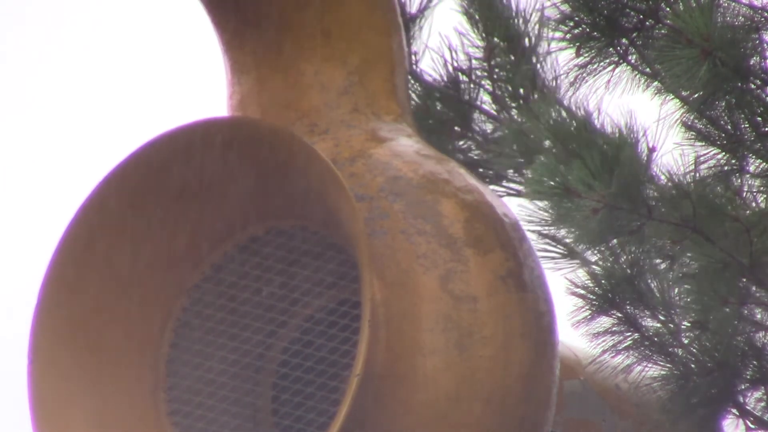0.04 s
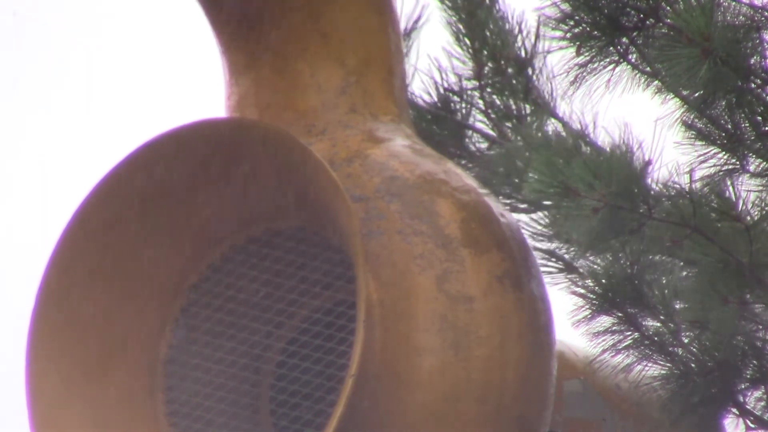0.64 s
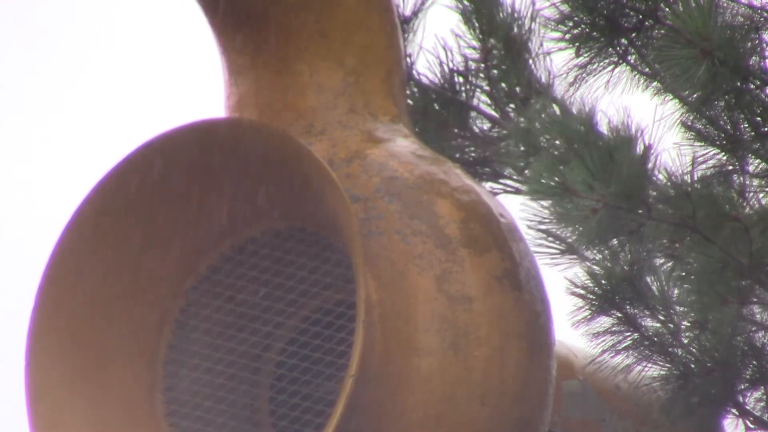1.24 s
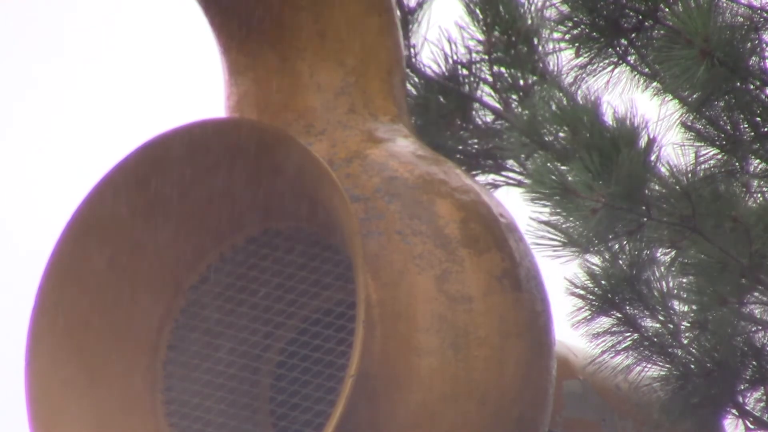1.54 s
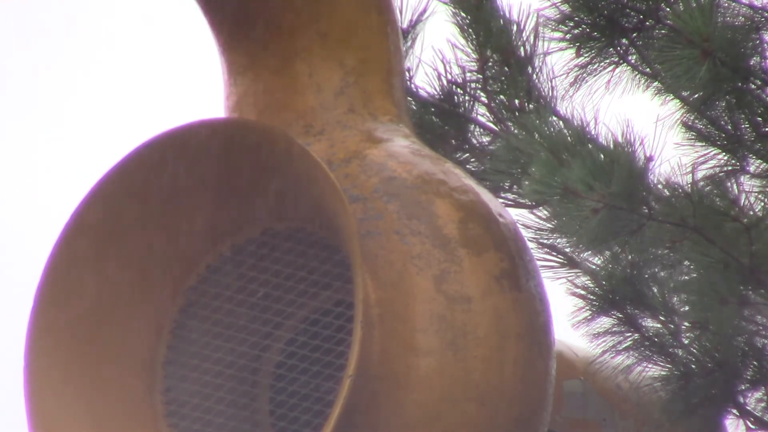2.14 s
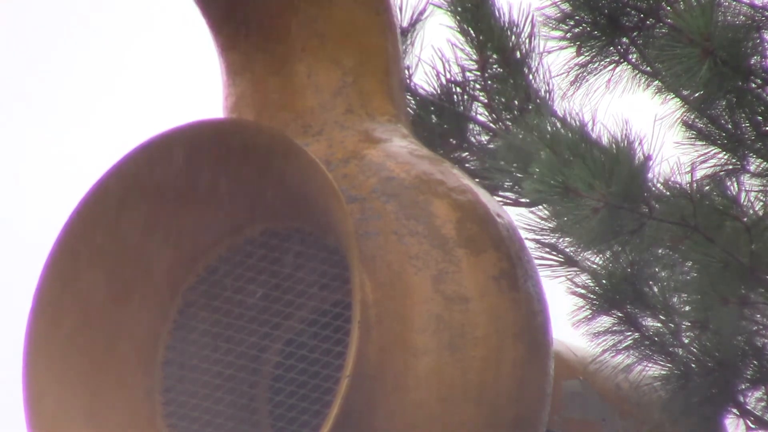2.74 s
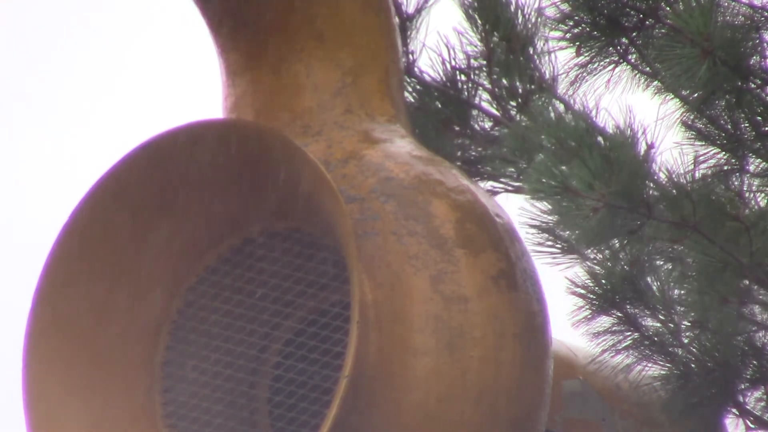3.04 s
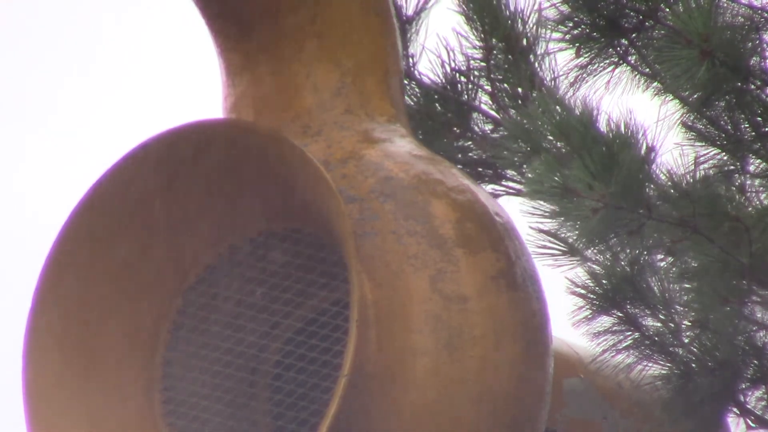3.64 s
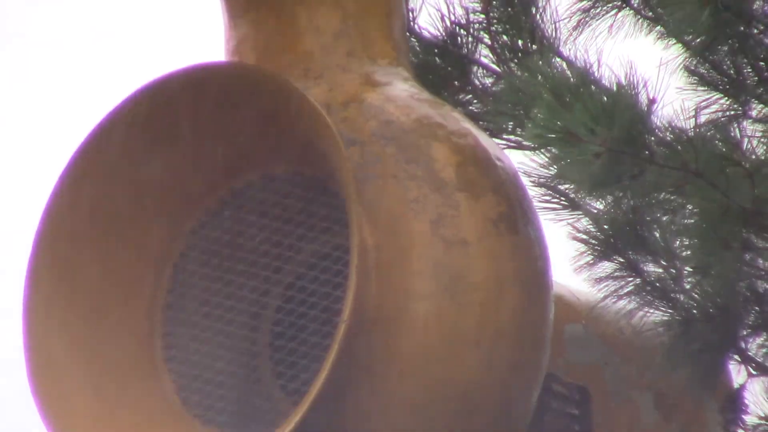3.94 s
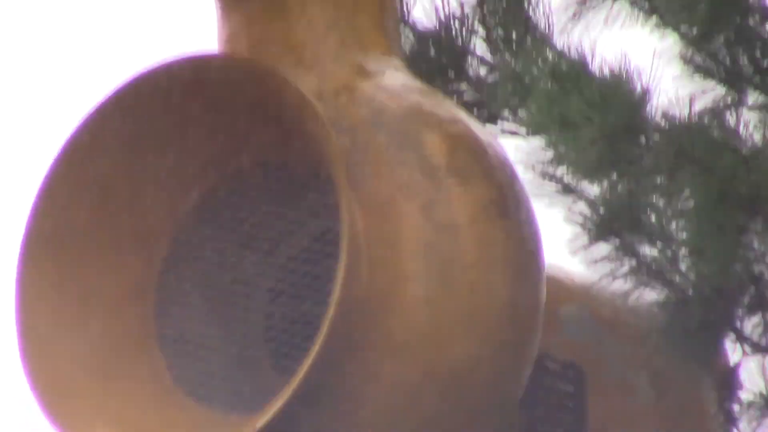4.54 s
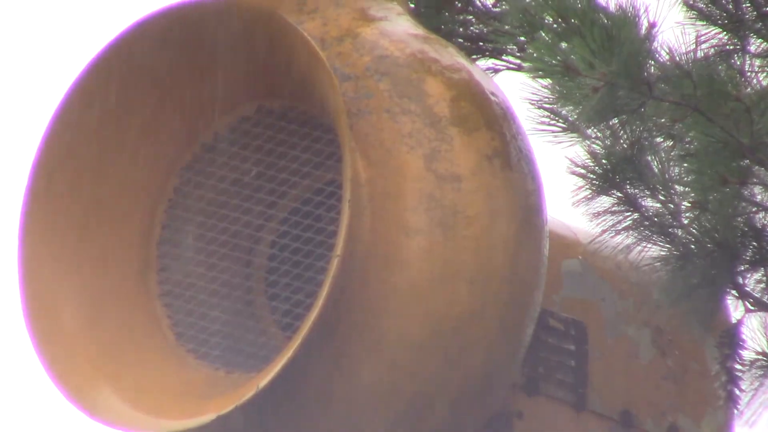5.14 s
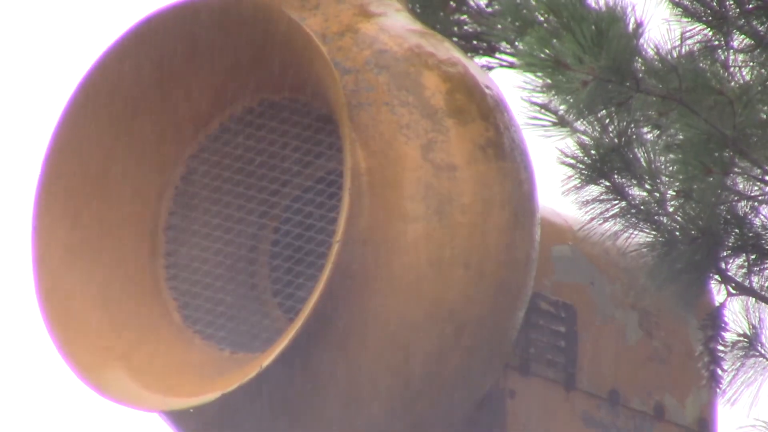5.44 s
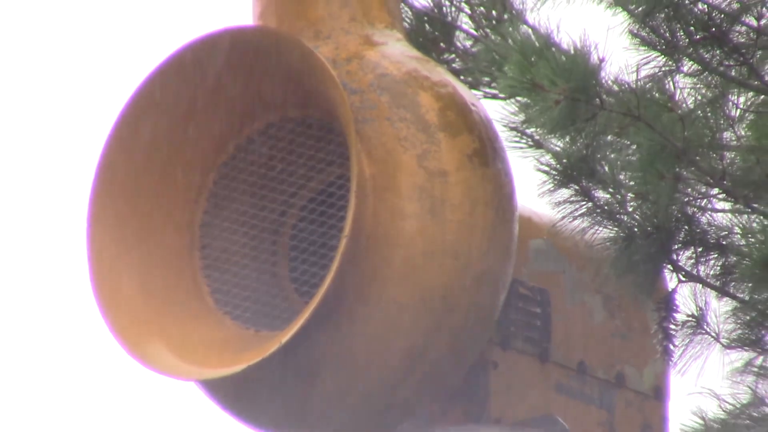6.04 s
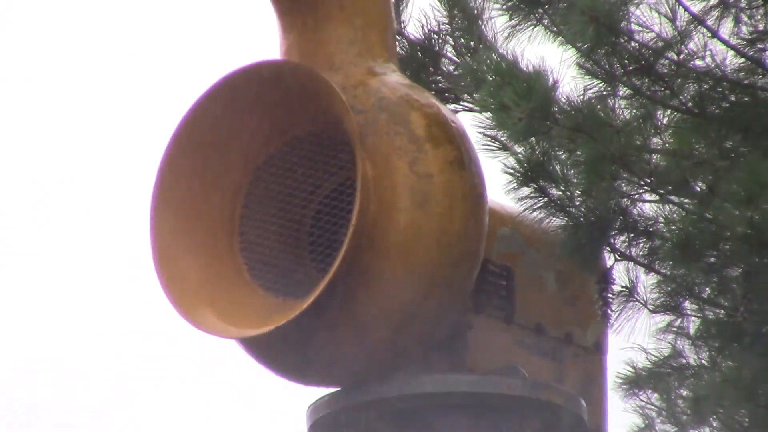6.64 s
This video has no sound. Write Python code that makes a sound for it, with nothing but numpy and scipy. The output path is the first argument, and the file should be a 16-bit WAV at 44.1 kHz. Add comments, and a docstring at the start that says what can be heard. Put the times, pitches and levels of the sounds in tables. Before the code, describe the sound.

Single raindrops tap and spatter on a metal casing up close, over soft drizzle and three high bird chips.

```python
"""A soft hiss of drizzle among pine trees, over a low rumble and the murmur of far surroundings.
Fine drops tick on the needles all around, and one far vehicle swells and recedes. A small bird gives
three high arched chips that echo in the trees; another whistles far off. Up front, single drops tap
on a casing right at the microphone: its wall thumps and rings, and the water spatters."""
import sys
import numpy as np
from scipy import signal
from scipy.io import wavfile

SR = 44100
rng = np.random.default_rng(int(sys.argv[2]) if len(sys.argv) > 2 else 0)


def materialize(psi):
    """Save the field psi as 16-bit PCM at rate SR to the path in sys.argv[1].

    A 1-D psi becomes a single channel; in a 2-D psi each row is a channel.
    """
    bounded = np.clip(np.atleast_2d(psi).T, -1, 1)
    quanta = np.round(bounded * 32767).astype(np.int16)
    wavfile.write(sys.argv[1], SR, quanta)


N = 299439
TIME = np.arange(N) / SR


def from_db(db):
    """Decibels to gain."""
    return 10 ** (np.asarray(db) / 20)


def rms_one(x):
    """Scale to rms 1."""
    return x / np.sqrt(np.mean(x ** 2) + 1e-20)


def energy_one(x):
    """Scale a short sound to unit energy per channel."""
    return x / np.sqrt(np.mean(np.sum(x ** 2, axis=-1)) + 1e-20)


def burst(x):
    """Scale a short sound to the energy of 10 ms at rms 1."""
    return energy_one(x) * np.sqrt(.01 * SR)


def at_hz(points, hz):
    """Read a curve on a log-frequency axis."""
    frequencies, values = np.transpose(points)
    return np.interp(np.log(hz), np.log(frequencies), values)


def band(x, low_hz, high_hz, order=2):
    """Causal band-pass."""
    sos = signal.butter(order, [low_hz, high_hz], "band", fs=SR, output="sos")
    return signal.sosfilt(sos, x + 1e-18)


def drift(per_s):
    """Random wander, gliding between values of spread 1."""
    knots = rng.standard_normal(400)
    return np.interp(TIME * per_s, np.arange(len(knots)), knots, period=len(knots))


def add(out, s, sound):
    """Mix a sound into out from time s on."""
    start = max(round(s * SR), 0)
    room = max(N - start, 0)
    out[..., start:start + sound.shape[-1]] += sound[..., :room]


def panned(sound, left_db):
    """Place a sound by level difference."""
    return sound * from_db([[left_db / 2], [-left_db / 2]])


# stereo image of the beds: (frequency [Hz], left-right correlation [0..1])
BED_CORRELATION = [(30, .3), (60, 0.89), (110, 0.94), (200, 0.9), (320, 0.8), (650, 0.87), (1000, .97),
                   (1800, 1), (5000, 1)]
def noise_bed(spectrum, flicker_db):
    """Stereo noise in twelve bands, each with its own level, width and flicker; rms 1."""
    out, edges = 0, np.geomspace(spectrum[0][0], spectrum[-1][0], 13)
    white = rng.standard_normal((2, 2, N))
    for k, (low, high) in enumerate(zip(edges, edges[1:])):
        mid, side = band(white[k % 2], low, high)
        hz = np.sqrt(low * high)
        alike = np.clip(at_hz(BED_CORRELATION, hz), 0, .995)
        gain = from_db(at_hz(spectrum, hz) + flicker_db * drift(16))
        out = out + gain * (np.sqrt(1 + alike) * mid + np.sqrt(1 - alike) * side * [[1], [-1]])
    return rms_one(out)


# tone of the low rumble and of the far murmur: (frequency [Hz], relative level [dB])
RUMBLE_EQ = [(25, -22), (48, -15.5), (65, -11.5), (100, -0.5), (150, 0), (200, 0.5), (300, -9)]
MURMUR_EQ = [(150, -14), (350, -8), (520, -4.5), (720, -2.5), (1020, 0.4), (1400, -1.65), (2000, -6.5),
             (3000, -12.5), (5000, -31)]
# fader ride that both follow: (time [s], level [dB])
SURROUNDINGS_RIDE = [(0.0, -57), (1.21, -58), (1.89, -57), (6.79, -61)]
def surroundings(rumble_db=-67.5, murmur_trim_db=0.6):
    """A low rumble and a far murmur sink slowly together."""
    ride_db = np.interp(TIME, *np.transpose(SURROUNDINGS_RIDE))
    rumble = from_db(rumble_db + ride_db - ride_db.mean()) * noise_bed(RUMBLE_EQ, flicker_db=2.0)
    murmur = from_db(ride_db + murmur_trim_db) * noise_bed(MURMUR_EQ, flicker_db=1.16)
    return rumble + murmur


# tone of far traffic: (frequency [Hz], relative level [dB])
TRAFFIC_EQ = [(130, -17.5), (200, -5), (260, -0.5), (330, -1.5), (450, -9), (800, -30)]
def far_traffic(start_db=-67.5, ease_db_per_s=0.65, peak_s=2.04, swell_db=8.5, rise_s=0.22, fall_s=1.5):
    """One vehicle comes out of the fading traffic hum and recedes."""
    since = TIME - peak_s
    swell = np.exp(-(np.minimum(since, 0) / rise_s) ** 2 - np.maximum(since, 0) / fall_s)
    level_db = start_db - ease_db_per_s * TIME + swell_db * swell
    return from_db(level_db) * noise_bed(TRAFFIC_EQ, flicker_db=1.0)


# tone of far rain and of drizzle: (frequency [Hz], relative level [dB])
WASH_EQ = [(250, -7.5), (430, 2.5), (600, 0), (1000, -15)]
DRIZZLE_EQ = [(1200, -16), (2200, 0.5), (3200, 0.5), (4500, -3.5), (6500, -6.5), (8000, -8.5), (10000, -17),
              (12500, -20.5), (15500, -31)]
def rain_bed(wash_db=-68.5, drizzle_db=-63, ease_db_per_s=0.27):
    """The hiss of drizzle slowly eases over a steady, dull wash of far rain."""
    drizzle = from_db(drizzle_db - ease_db_per_s * TIME) * noise_bed(DRIZZLE_EQ, flicker_db=1.0)
    wash = from_db(wash_db) * noise_bed(WASH_EQ, flicker_db=2.0)
    return drizzle + wash


def patter(per_s=70, level_db=-71, t60=0.011):
    """Small drops on needles and ground, each a brief tick: the higher, the fainter."""
    out, t = np.zeros((2, N)), TIME[:SR // 40]
    for when, pitch, place in rng.random((int(per_s * N / SR), 3)):
        hz = 1500 * 5.0 ** pitch
        tick = band(rng.standard_normal(len(t)) * from_db(-60 * t / t60), hz / 1.42, hz * 1.31)
        add(out, when * N / SR, panned(from_db(-11 * pitch) * burst(tick), 4 * (place - .5)))
    return from_db(level_db) * rms_one(out)


# clearest ticks on the needles: (time [s], level [dB], brightness [Hz])
NEEDLE_TICKS = [(0.0616, -66, 8500), (0.6515, -68, 5430), (1.2615, -64, 7000), (1.8684, -64.5, 6000),
                (3.3403, -65, 7100), (3.444, -64, 2500), (3.481, -67, 7500), (3.6078, -73, 4500),
                (4.02, -63, 2100), (4.2053, -68, 7000), (4.689, -68.5, 8500), (5.0231, -63, 4800),
                (5.462, -64, 5500), (6.3405, -69, 9000), (6.624, -63, 2980), (6.786, -65, 3200)]
def needle_ticks(t60=0.0054):
    """The nearest drops on the needles stand out as fine, dry ticks."""
    out, t = np.zeros(N), TIME[:SR // 40]
    for s, db, hz in NEEDLE_TICKS:
        click = rng.standard_normal(len(t)) * from_db(-60 * t / t60)
        add(out, s, from_db(db) * burst(band(click, hz / 1.25, hz * 0.98, order=1)))
    return out


def tree_echoes(x, t60, echo_s, echo_db, tail_db, near_db, near_t60):
    """Add one clear reflection, a cluster of echoes from near branches and a thin tail from the wood."""
    t = TIME[:SR]
    fade = (from_db(-60 * t / t60) + from_db(near_db - 60 * t / near_t60)) * (t > echo_s / 4)
    scatter = (rng.standard_normal(SR) + 0.12 * rng.standard_normal((2, SR))) * fade
    response = from_db(tail_db) * energy_one(scatter)
    response[:, round(echo_s * SR)] += from_db(echo_db)
    response[:, 0] += 1
    return signal.fftconvolve(x[None], response, axes=1)[:, :N]


# far bird's whistles: (time [s], start pitch [Hz], end pitch [Hz], dry level [dB])
FAR_WHISTLES = [(1.117, 3730, 3100, -68.5), (1.262, 4120, 3450, -67.5), (4.69, 4550, 4650, -74),
                (4.998, 4350, 4750, -80), (5.68, 3580, 2900, -70.5)]
def far_bird(length_s=0.06, waver=0.055):
    """Thin, wavering slurs that fall or rise, heard mostly through the echoes of the wood."""
    out, u = np.zeros(N), np.linspace(0, 1, round(length_s * SR))
    for s, start_hz, end_hz, db in FAR_WHISTLES:
        glide_hz = end_hz + (start_hz - end_hz) * (1 - u) ** 1.5
        phase = 2 * np.pi * np.cumsum(glide_hz * (1 + waver * drift(918)[:len(u)])) / SR
        add(out, s, from_db(db) * signal.windows.tukey(len(u), .5) * np.sin(phase))
    return tree_echoes(out, t60=0.51, echo_s=0.03, echo_db=-16, tail_db=10.5, near_db=4, near_t60=0.095)


# near bird's chips: (centre time [s], top of the fundamental [Hz], half length [s], dry level [dB])
NEAR_CHIPS = [(0.705, 3374, 0.018, -44.5), (4.529, 3275, 0.0172, -48), (6.4475, 3477, .0163, -46.5)]
def near_bird(arch=0.5, waver=0.018, rough_db=2.0, first_db=-10.5, third_db=-24.5):
    """The pitch shoots up, rounds over and falls more slowly; the second harmonic carries the chip."""
    out = np.zeros(N)
    for s, top_hz, half_s, db in NEAR_CHIPS:
        u = 2 * np.linspace(0, 1, round(2 * half_s * SR)) ** 0.8 - 1   # -1 to 1, top of the arch at 0
        rising, from_top = u < 0, np.abs(u)
        unsteady = drift(900)[:len(u)] * (0.25 + 2 * from_top)
        sag = arch * from_top ** np.where(rising, 3.79, 2.7)
        phase = 2 * np.pi * np.cumsum(top_hz * (1 - sag + waver * unsteady)) / SR
        flank_db = np.where(rising, -6.5, -10.0) * np.minimum(from_top / 0.57, 1) ** 2
        second = from_db(flank_db + rough_db * unsteady) * np.sin(2 * phase)
        others = from_db(first_db) * np.sin(phase) + from_db(third_db) * np.sin(3 * phase)
        chip = signal.windows.tukey(len(u), .08) * (second + (1 - u ** 2) * others)
        add(out, s - half_s, from_db(db) * chip)
    wet = tree_echoes(out, t60=0.76, echo_s=0.015, echo_db=-18, tail_db=-3.5, near_db=10, near_t60=0.17)
    return panned(wet, 1.7)


# resonances of the casing: (frequency [Hz], relative level [dB], t60 [s])
CASING_MODES = [(1910, 3, 0.016), (2160, 7.5, 0.0045), (2725, 6, 0.013), (2950, -13, 0.0021)]
def casing_ring(t, detune=0.01, apart_rad=0.27):
    """The casing rings briefly; where a drop lands shifts the modes a little."""
    out = 0
    for k, (hz, db, t60) in enumerate(CASING_MODES):
        shifted_hz = hz * (1 + detune * rng.standard_normal())
        lead = apart_rad * (-1) ** k * np.array([[1], [-1]])   # reaches the two sides out of step
        out = out + from_db(db - 60 * t / t60) * np.sin(2 * np.pi * shifted_hz * t + lead)
    return band(out, 1520, 4260, order=4)


def wall_thump(t, hz, give_db, glancing, overtone_db=-7.5):
    """The wall springs back: at once where it is stiff, within a few swings where it yields."""
    settle_s = 0.00069 * from_db(0.79 * give_db)
    overtone = from_db(overtone_db) * glancing * 2 * np.sin(2 * np.pi * 1.65 * hz * t)
    swing = np.sin(2 * np.pi * hz * t) + overtone
    return band(t * np.exp(-t / settle_s) * swing, 165 + 90 * glancing, 540 + 330 * glancing)


def panel_sway(t, hz=240, settle_s=0.0025):
    """The whole panel sways, giving the tap its low body."""
    return band(t * np.exp(-t / settle_s) * np.sin(2 * np.pi * hz * t), 126, 470)


def spot_ping(t, hz, t60=0.0032):
    """The bright ring of the very spot that is hit."""
    return band(from_db(-60 * t / t60) * np.sin(2 * np.pi * hz * t), hz / 1.5, hz * 1.8, order=1)


def spatter(t, glancing, square_t60=0.0062, glancing_t60=0.019, fallback_s=0.02, grain_db=4.5, width=0.14):
    """Uneven droplets fly to both sides; some are thrown up and patter back a moment later."""
    t60 = square_t60 + glancing * (glancing_t60 - square_t60)
    tail = from_db(-29 - 60 * t / 0.24)
    fallback = from_db(-19) * np.exp(-(2 * (t / fallback_s - 1)) ** 2)
    fade = from_db(-60 * (t / t60) ** 1.75) + glancing * (tail + fallback)
    mid, side = rng.standard_normal((2, len(t))) * fade * from_db(grain_db * rng.standard_normal(len(t)))
    return energy_one(mid + width * side * [[1], [-1]])


def faint_drops(per_s=4.6, strength_db=-71.5, spread_db=10, thump_hz=497):
    """Random droplets on wetter and drier spots, too light to sway or ping; rows as in CASING_DROPS."""
    when, size, spot = rng.random((int(per_s * N / SR), 3)).T
    strengths = strength_db + spread_db * (2 * size - 1)
    wetness_db = 4 * spot - 1
    return [(s, db, 0, wet_db, thump_hz, 0, -np.inf, 240, -np.inf, 1, 0)
            for s, db, wet_db in zip(when * N / SR, strengths, wetness_db)]


# drops on the casing: (time [s], strength [dB], give of the wall [dB], wetness [dB], thump pitch [Hz],
#   pan left [dB], sway level [dB], ping pitch [Hz], ping level [dB], spatter [0..1], fine spray [dB])
CASING_DROPS = [(1.0918, -56.5, 5, -3, 437, 0, -56, 1150, -55, 0.36, -3),
                (1.4838, -48.5, 11, -11.5, 425, .5, -66, 2900, -55, 0.86, -2),
                (1.5378, -45.5, 10, -2, 377, .5, -63, 3200, -42, 1, -8),
                (1.6045, -47.5, -0.5, -1, 527, -1.5, -55, 2020, -54, 0.72, 0.5),
                (1.7973, -39.5, -4, 0, 710, 1.5, -48.5, 2850, -37, 1, -1.5),
                (1.9258, -51, -6, -12, 400, -1.5, -69, 3100, -56, .7, 0),
                (2.1189, -52, 4, -8, 623, -1, -66, 5900, -62, 0.76, 2),
                (2.3279, -55.5, 2, -5, 438, 1.5, -61, 1020, -53, 1, 1),
                (3.0466, -68, 7, 12, 325, 1.5, -56, 4900, -57, 0.26, 7),
                (3.2943, -26, -0.2, -17, 490, -4, -64, 2030, -31.5, 0.74, 2),
                (3.5283, -58, -22, -19, 404, -0.5, -68, 2200, -57.5, 0.62, 0),
                (3.9688, -78, 8, 19.5, 750, 1, -73, 9400, -66, .1, 3),
                (4.6487, -53.5, 3.5, -13, 396, 0, -62, 960, -61, 0.52, -1),
                (4.8147, -60.5, 0, -10, 440, -.5, -67, 2700, -71, 0.64, 0),
                (5.5788, -63, 5.5, -1, 500, -1, -73, 2700, -72, 1, 2),
                (5.9198, -52.5, -14, -7.5, 413, 4, -68, 1400, -70, 0.52, 0),
                (6.0943, -64.5, 5, 2, 467, -2.5, -75, 8300, -67, 1, 1),
                (6.2906, -57.5, -4, -10, 520, 0, -72, 1860, -64, 0.21, 5),
                (6.734, -56, 5.5, 1, 570, 2.5, -55, 9350, -65, 0.83, 4)]
def casing_drops(square_hit_db=-34, middling_db=-47.5, middling_knock_db=-51.5, crackle=5.5):
    """A sharp impact and a short spatter: the casing thumps and rings, the water ticks and sprays."""
    out, t = np.zeros((2, N)), TIME[:SR // 12]
    impact = signal.unit_impulse(len(t))
    for row in list(CASING_DROPS) + faint_drops():
        s, db, give_db, wet_db, thump_hz, left_db, sway_db, ping_hz, ping_db, amount, fine_db = row
        # near 0: a heavy square hit, mostly impact; near 1: a glancing one, mostly spatter
        glancing = 1 / (1 + from_db(db + give_db - square_hit_db))
        splash = 2.8 * amount * glancing * spatter(t, glancing)
        force = impact + splash
        knock = band(force, 900 - 380 * glancing ** 2, 1060 + 950 * glancing ** 2)
        # the knock grows more slowly than the weight of the blow
        knock_db = middling_knock_db + 0.46 * (db + give_db / 2 - middling_db) + 2 * glancing
        ring = energy_one(casing_ring(t)) + crackle * glancing * band(splash, 2280, 3120)
        tick = band(band(force, 3740, 6900), 3400, 5800)
        spray_top_hz = np.interp(glancing, [0, 1], [13400, 8840])   # a square hit sprays finer
        spray = band(force, 0.66 * spray_top_hz, spray_top_hz)
        drop = (from_db(db + give_db + 0.7) * burst(wall_thump(t, thump_hz, give_db, glancing))
                + from_db(sway_db) * burst(panel_sway(t))
                + from_db(ping_db) * burst(spot_ping(t, ping_hz))
                + from_db(knock_db) * burst(knock)
                + from_db(db - 2.5) * burst(ring)
                + from_db(db + wet_db) * burst(tick)
                + from_db(db + wet_db + fine_db - 8 - 3 * glancing) * burst(spray))
        add(out, s, panned(drop, left_db))
    return out


def scene():
    """Back to front: the beds, fine rain, two birds and the close taps on the casing."""
    beds = panned(surroundings() + far_traffic() + rain_bed(), 0.1)
    return beds + patter() + needle_ticks() + far_bird() + near_bird() + casing_drops()


def record(dry):
    """A steep high cut at 15.7 kHz."""
    return signal.sosfilt(signal.ellip(10, .1, 80, 15700, fs=SR, output="sos"), dry)


dry = scene()
out = record(dry)
materialize(out)
```